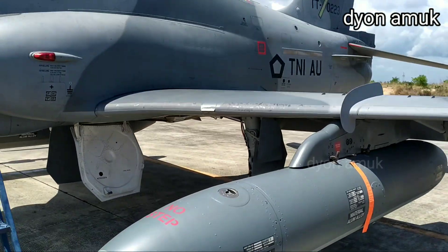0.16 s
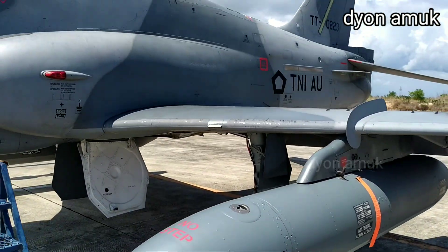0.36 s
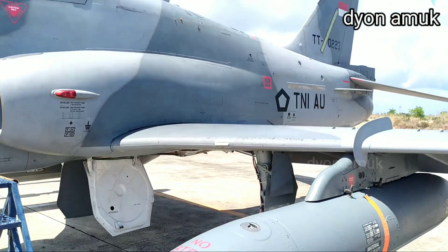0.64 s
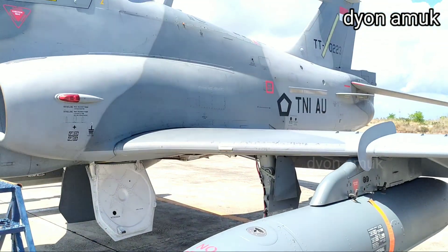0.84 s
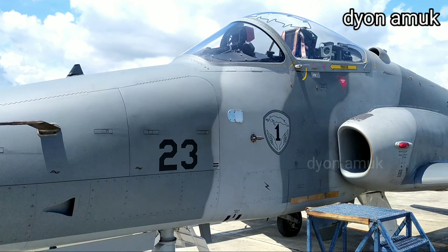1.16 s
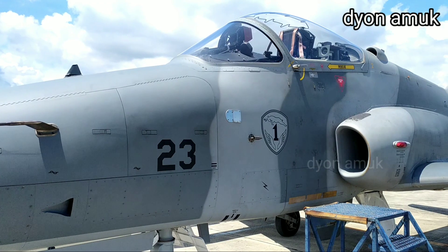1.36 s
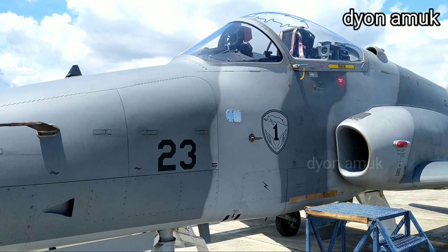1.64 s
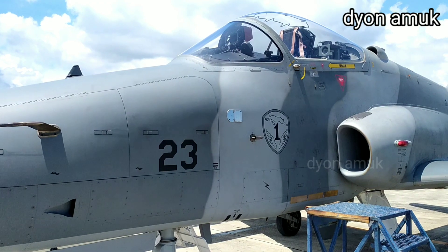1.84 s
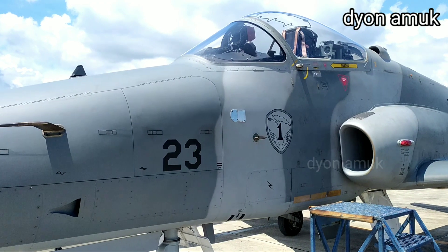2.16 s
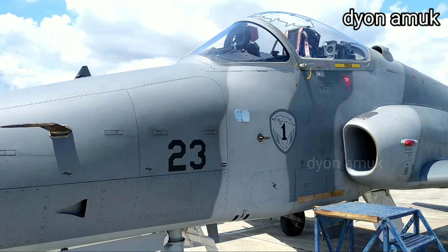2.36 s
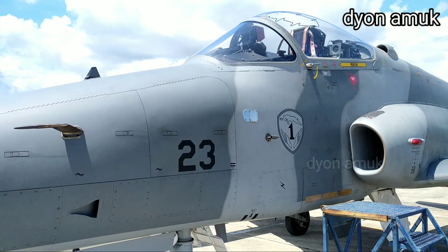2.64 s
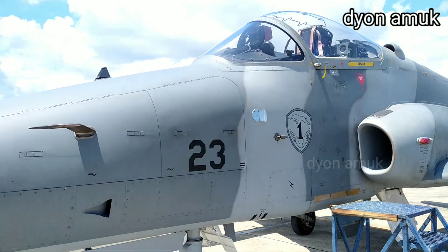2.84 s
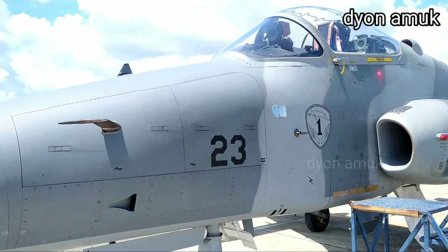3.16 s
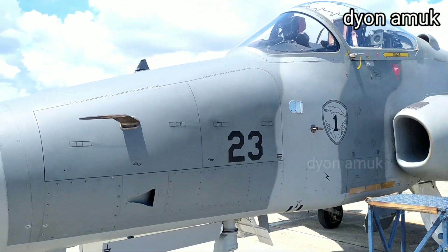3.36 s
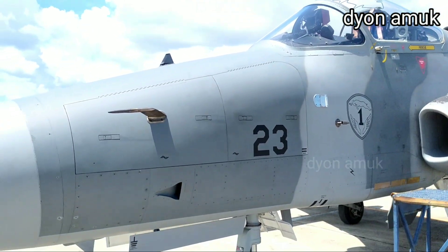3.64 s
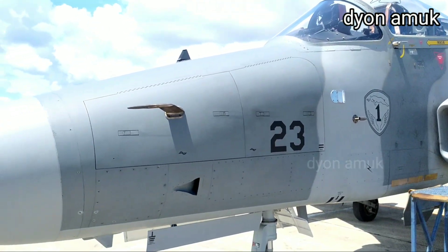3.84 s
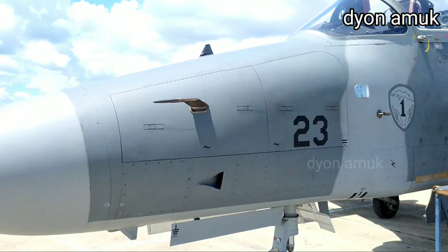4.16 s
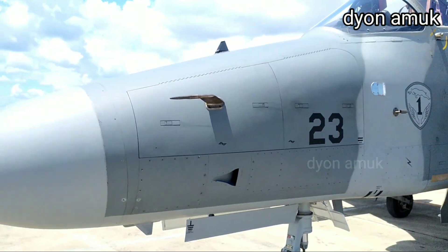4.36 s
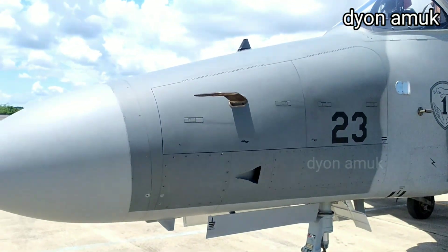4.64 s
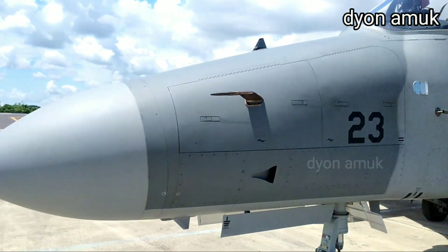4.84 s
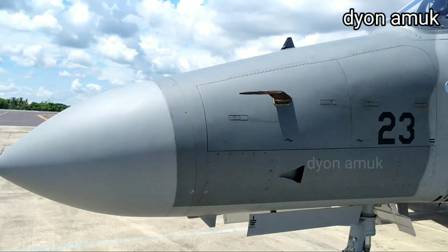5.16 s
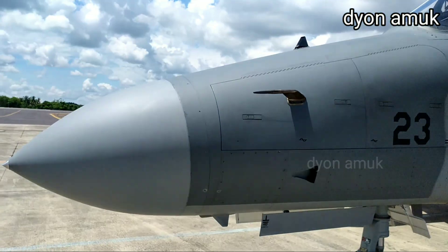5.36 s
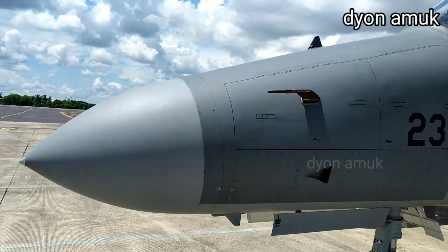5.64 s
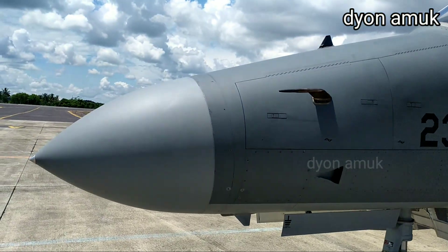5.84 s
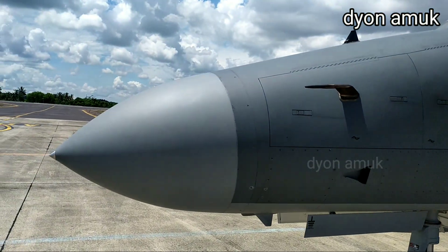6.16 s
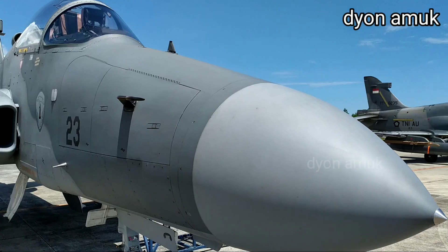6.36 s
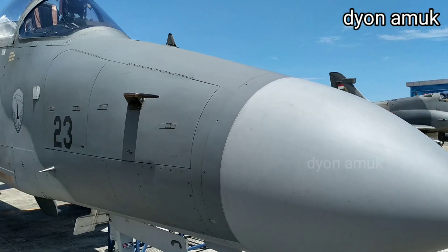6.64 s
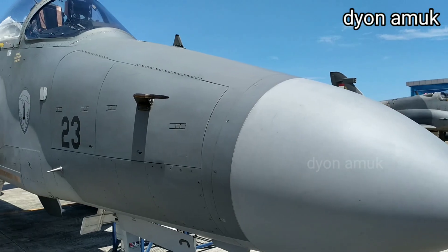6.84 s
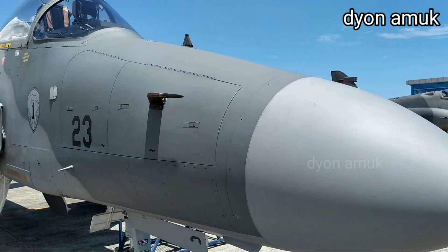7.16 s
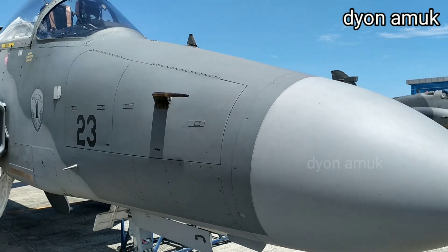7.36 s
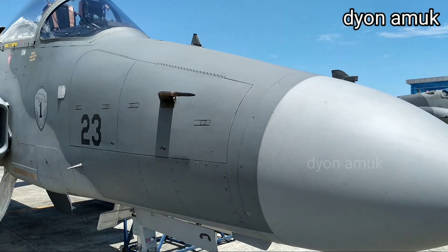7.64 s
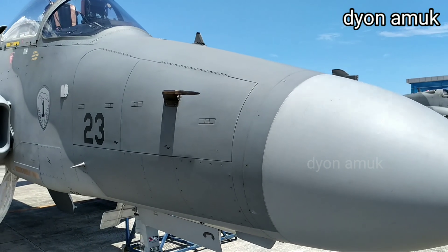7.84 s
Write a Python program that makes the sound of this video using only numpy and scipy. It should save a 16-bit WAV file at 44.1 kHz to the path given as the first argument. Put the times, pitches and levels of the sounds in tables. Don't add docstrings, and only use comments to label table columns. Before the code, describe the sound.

Close turbine roar and wavering high whine on an open apron, with buffeting wind and two abrupt dropouts between three differently coloured views.

```python
import sys
import numpy as np
from scipy import signal
from scipy.fft import rfft, irfft, next_fast_len
from scipy.io import wavfile
from scipy.ndimage import uniform_filter1d, minimum_filter1d, map_coordinates

SR = 44100
rng = np.random.default_rng(int(sys.argv[2]) if len(sys.argv) > 2 else 0)


def convert_level_to_amplitude(level_db):
    exponent = np.asarray(level_db, float) / 20
    return 10 ** exponent


def unload_audio(sound):
    columns = np.transpose(np.atleast_2d(sound))
    steps = np.round(np.clip(columns, -1, 1) * 32767)
    wavfile.write(sys.argv[1], SR, steps.astype(np.int16))


N = 352519
T, SIZE = np.arange(N) / SR, next_fast_len(N, True)
F = np.arange(SIZE // 2 + 1) * SR / SIZE
SLOW = np.arange(N // 512 + 2) * 512 / SR
WINDOW = np.sin(np.pi * (np.arange(1024) + .5) / 1024)

# f/Hz, left level/dB per Hz, right level/dB per Hz
BESIDE = [(262, -66.5, -68), (595, -73.5, -72), (1006, -77.5, -77.5), (1284, -78.5, -88.5),
          (1840, -78, -84.5), (2030, -72.5, -85), (2650, -75, -86.5), (3320, -75.5, -89),
          (3770, -78.5, -89), (3930, -81.5, -87), (5760, -87.5, -87), (6700, -84, -95.5), (7930, -84, -90),
          (9170, -100, -91), (11150, -88.5, -93.5), (11300, -90, -97), (12900, -96, -94),
          (15570, -113.0, -113.0), (15400, -122, -122)]
INTAKE = [(250, -65.5, -53), (728, -74, -73.5), (950, -79, -79), (1396, -84, -83), (1780, -81.5, -79),
          (1990, -74.5, -81.5), (2590, -71, -84), (3300, -72.5, -85), (3730, -74, -87.5),
          (4300, -79, -85.5), (5800, -95, -87.5), (6800, -82.5, -87.5), (8100, -81, -95.5),
          (8900, -93.5, -99), (11000, -86, -97.5), (12100, -91, -96.5), (13200, -88.5, -94),
          (14700, -116, -116), (15400, -120, -120)]
NOSE = [(250, -65.5, -61), (744, -71.5, -71), (950, -73, -74.5), (1396, -77, -79.5), (1776, -78, -81.5),
        (2000, -75.5, -85), (2600, -73, -83.5), (3290, -75, -90), (3700, -76, -84.5), (4300, -77.5, -90.5),
        (5800, -91, -92.5), (6800, -89, -96), (8100, -78.5, -100), (8900, -99, -93.5), (11000, -94, -91.5),
        (12100, -88.5, -96.5), (13200, -93, -95), (14700, -94, -109), (15400, -100, -114)]
ACROSS = [(250, -68, -77), (734, -75.5, -77), (970, -79.5, -80), (1410, -80, -90), (1790, -83, -92.5),
          (2020, -86.5, -91), (2600, -92.5, -90.5), (3300, -84.5, -87.5), (3700, -94, -85.5),
          (4400, -88.5, -87.5), (5800, -98, -93), (6800, -95.5, -97), (8100, -90.5, -92.5),
          (8900, -95.5, -87.5), (11000, -102.5, -102.5), (12100, -99, -100), (13200, -95, -96.5),
          (14700, -110, -110), (15400, -122, -122)]
ROAR_COLOUR = np.array([BESIDE, INTAKE, NOSE, ACROSS])
# t/s, level/dB
SWELL = [(.2, -3.5), (.65, 0), (.95, -3), (1.35, -4), (1.6, -2.5), (2.1, 0.5), (2.4, -1.4), (3.15, 0.5),
         (3.48, 5), (3.7, 2), (3.95, 2.5), (4.3, -0.7), (4.8, 0.3), (5.5, -0.6), (5.85, 1.6), (6.2, 0.1),
         (7., 4), (7.25, 2), (7.8, 3.5)]
# t/s, level/dB
TOP_FLARES = [(.4, -1.5), (1.1, -2), (1.6, 0.5), (2.2, -1.5), (3.0, 1.5), (3.85, -2), (4.45, -2.5),
              (5.3, 0.5), (6.2, -1), (7.33, 4)]
# t/s, level/dB
AIR = [(0, -8), (3.1, -6), (3.5, -2.5), (3.9, 3), (4.3, 1), (5.0, 0.5), (5.9, 0), (6.4, -6), (6.6, 7),
       (7.1, 4), (7.3, 9), (7.6, 4), (8, 5)]


def roar(whine_db):
    swell_db, = curves(SWELL)
    mid_db, high_db, right_db = swell_db, 0.81 * swell_db + 0.83 * whine_db, 0.7 * swell_db
    top_db, air_db = flares(TOP_FLARES, width_s=0.2), curves(AIR)[0]
    shared, apart = rng.standard_normal((2, N))
    f, s, z = signal.stft(np.array([late(shared), shared, apart]), SR, WINDOW, 1024)
    octave = np.log(f + 1)
    like = likeness(octave, len(s))
    z = np.array([z[0], like * z[1] + np.sqrt(1 - like ** 2) * z[2]])
    gain = np.zeros(z.shape)
    band_hz = ROAR_COLOUR[0, :, 0]
    for k, hz in enumerate(band_hz):
        band = np.interp(octave, np.log(band_hz), np.arange(len(band_hz)) == k)
        left_level = by_heading(ROAR_COLOUR[:, k, 1])
        right_level = by_heading(ROAR_COLOUR[:, k, 2 if k else 1])
        if 1500 < hz < 8500:
            left_level = left_level + (mid_db if hz < 5000 else high_db)
            right_level = right_level + right_db
        if 10500 < hz < 14000:
            left_level, right_level = left_level + top_db, right_level + .6 * top_db
        if hz > 14000:
            left_level, right_level = left_level + air_db, right_level + air_db
        level = convert_level_to_amplitude(np.array([left_level, right_level]) + 0.67 * walk(5))
        gain[:, band > 0] += band[band > 0, None] * level[:, None, :len(s)]
    gain *= body_notches(f, len(s))
    out = signal.istft(z * gain * np.sqrt(SR / 2), SR, WINDOW, 1024)[1][:, :N]
    return signal.sosfilt(signal.butter(3, 62., "high", fs=SR, output="sos"), out)


# f/Hz, likeness/0-1
LIKENESS = [(250, 1), (850, 1), (1700, 0.61), (3500, 0.4), (5800, 0.1), (8900, 0), (14500, 0.2)]
# f/Hz, change of likeness/1
FOCUS = [
    (1600, -0.11),
    (1730, -0.35),
    (1390, -0.063),
    (2300, -1.5),
]
# f/Hz, change of likeness/1
NARROW_FOCUS = [(1850, .02), (1800, 0.25), (1768, .3), (3330, 0.9)]
# t/s, change of likeness/1
LATE_FOCUS = [(5.3, 0), (5.8, 0.085), (6.05, 0.29), (6.5, 0.29), (6.51, 0.16)]
# f/Hz, change of likeness/1
OPPOSED = [(5550, -0.25), (5680, -0.56), (5900, -0.36), (14900, -1.1)]


def likeness(octave, frames):
    like_hz, like = np.transpose(LIKENESS)
    like = np.clip(np.interp(octave, np.log(like_hz), like), 0, 1)[:, None]

    def bell(hz, width):
        return np.exp(-((octave[:, None] - np.log(hz)) / width) ** 2)

    for table, width in ((FOCUS, .28), (NARROW_FOCUS, .1)):
        hz, change = (by_heading(c)[:frames] for c in np.transpose(table))
        like = np.clip(like + change * bell(hz, width), 0, 1)
    like = np.clip(like + curves(LATE_FOCUS)[0][:frames] * bell(1430., 0.71), 0, 1)
    hz, change = (by_heading(c)[:frames] for c in np.transpose(OPPOSED))
    return np.clip(like + change * bell(hz, 0.039), -1, 1)


# t/s, f/Hz
BODY_NOTCH = [(0, 5550), (1.1, 5680), (3.4, 5680), (4.5, 5720), (5.1, 5800), (5.4, 6100), (6.4, 6300),
              (6.6, 6650), (8, 6650)]
# f/Hz, left depth/0-1, right depth/0-1
PORT_NOTCH = [
    (5200, 0, 0.1),
    (3340, 0.07, 0.8),
    (4450, 0, .35),
    (5000, 0.9, 0.37),
]


def body_notches(f, frames):
    gain = 1
    for notch_hz, width_hz, depth in (
            (curves(BODY_NOTCH)[0], 230., by_heading([0.43, 0.48, 0.71, 0.055])[:frames]),
            (by_heading([14100, 13600, 13750, 14500]), 250., .5),
            (by_heading([9300, 8520, 8840, 10400]), 260., .45),
            (by_heading([11200, 11420, 11950, 11600]), 600., by_heading([0.32, 0.41, 0.23, 0.068])[:frames])):
        gain = gain * (1 - depth * np.exp(-((f[:, None] - notch_hz[:frames]) / width_hz) ** 2))
    notch_hz, *depth = (by_heading(c)[:frames] for c in np.transpose(PORT_NOTCH))
    return gain * (1 - np.array(depth)[:, None] * np.exp(-((f[:, None] - notch_hz) / 190.0) ** 2))


GEAR_HZ = 640.7
TONE_HZ = [
    200.5,
    813.5,
    GEAR_HZ,
    2 * GEAR_HZ,
    3 * GEAR_HZ,
    4 * GEAR_HZ,
    5 * GEAR_HZ,
    2650,
    9460,
    9748,
]
# level/dB rms beside, at intake, at nose, across
TONES = [(-43.5, -44, -44, -45.5), (-49, -48, -47, -53.5), (-53, -63.5, -48.5, -70),
         (-61.5, -61.5, -52.5, -59.5), (-55, -53.5, -57, -56.5), (-62, -55, -57, -76),
         (-61.5, -56, -60, -76.1), (-56, -51.5, -54, -67), (-80, -73.5, -75.5, -80),
         (-57.5, -55.5, -53.5, -65)]
TONE_WIDTH_HZ = [6., 3., 3., 3., 10., 6., 8., 25., 50., 12.]
# t/s, level/dB
GEAR_FLARES = [(.35, -7), (.85, 4.5), (1.35, 10.5), (2.95, 9.5), (3.3, -9), (3.8, -11), (4.25, 4.5),
               (4.62, 2), (5.15, -6.5), (5.85, -21.5)]
# t/s, level/dB
BLADE_BEAM = [(.1, -10.5), (.5, -2), (.9, -2), (1.5, -3), (1.9, 1.5), (2.5, 4.5), (2.9, 2), (4.1, -1.5),
              (4.7, -3.5), (5.1, -1), (5.8, -4.5), (6.3, 3), (6.7, -2), (7.5, -6), (8, -1)]
# t/s, left lead/rad
BLADE_LEAD = [(0, 2.9), (.6, 2), (1.15, 3.2), (2.65, 3), (3.1, 1.4), (3.6, -.8), (4.1, -1.2), (4.6, -2.3),
              (5.1, -1.9), (5.45, -4.3), (6.5, -4.2), (6.6, -3.3), (8, -3.3)]


def tones(whine_db):
    whine_db = whine_db + curves(BLADE_BEAM)[0]
    gear_db = flares(GEAR_FLARES, width_s=0.29)
    hump_shape = sum(1 / (1 + ((F - hz) / width_hz) ** 2) for hz, width_hz in ((9450., 80.), (9760., 130.)))
    hump = irfft(rfft(rng.standard_normal((2, SIZE))) * hump_shape, SIZE)[:, :N]
    hump_db = by_heading([-54.5, -58, -57.0, -61.0]) + whine_db
    hump_left, hump_right = hump / hump.std() * fine(convert_level_to_amplitude(hump_db))
    lead = fine(curves(BLADE_LEAD)[0] + .5 * walk(5))
    right = convert_level_to_amplitude(-4.5) * (0.81 * hump_left + 1.44 * hump_right)
    blades = np.real(signal.hilbert(hump_left, SIZE)[:N] * np.exp(1j * lead))
    left = 0
    for k, (hz, db, width_hz) in enumerate(zip(TONE_HZ, TONES, TONE_WIDTH_HZ)):
        is_blade = hz > 9000
        phase = 2 * np.pi * np.cumsum(fine(hz + .5 * width_hz * walk(12))) / SR
        flare_db = whine_db - 0.5 if is_blade else gear_db if k == 2 else 0
        waver_db = 2.6 if k in (3, 4) or is_blade else 1.4
        level_db = by_heading(db) + flare_db + waver_db * walk(8) - .7
        shade_db = by_heading([np.interp(hz, a[:, 0], a[:, 2] - a[:, 1]) * (600 < hz < 9000)
                               for a in ROAR_COLOUR])
        right = right + np.sqrt(2) * np.sin(phase) * fine(convert_level_to_amplitude(level_db + shade_db - 0.82 * is_blade))
        if is_blade:
            blades = blades + np.sqrt(2) * np.sin(phase + lead) * fine(convert_level_to_amplitude(level_db))
        else:
            left = left + np.sqrt(2) * np.sin(phase) * fine(convert_level_to_amplitude(level_db))
    return np.array([late(left) + blades, right])


# t/s, left after right/ms
PORT_LAG = [(0.05, 0.255), (0.85, 0.245), (1.95, 0.225), (2.75, 0.24), (3.95, 0.285), (5.15, 0.31),
            (5.75, .325), (6.3, 0.35)]
# f/Hz, left lead/rad
ACROSS_LEAD = [(0, 0), (860, 1.7), (1250, 2.7), (1750, 2.8), (2600, 4.4), (3330, 3.15), (3500, 2.6),
               (3950, .6), (4700, .3)]


def late(x, knee_hz=1890.0, detour_ms=0.16):
    spectrum = rfft(x, SIZE)
    detour = np.exp(-2j * np.pi * np.maximum(F - knee_hz, 0) * detour_ms / 1000)
    near = irfft(spectrum * detour, SIZE)[:N]
    lag = np.interp(T, *np.transpose(PORT_LAG)) * SR / 1000
    near = map_coordinates(near, [np.arange(N) - lag], order=3, mode="nearest")
    across = irfft(spectrum * np.exp(1j * np.interp(F, *np.transpose(ACROSS_LEAD))), SIZE)[:N]
    return np.where(T < 6.5, near, across)


# start t/s, end t/s, level/dB
GUSTS_LEFT = [(.08, .2, -50), (.48, .7, -42), (.88, .93, -49), (1.2, 1.28, -32.5), (1.37, 1.45, -31),
              (1.5, 1.97, -34), (1.63, 1.87, -26), (3.39, 3.67, -38.5), (3.69, 3.74, -33),
              (3.86, 3.97, -33.5), (4.28, 4.67, -28.5), (4.08, 4.24, -31), (4.75, 4.97, -40),
              (5.55, 5.77, -54.5), (6.22, 6.4, -57), (7., 8., -47)]
GUSTS_RIGHT = [(-.1, .03, -30), (.31, .41, -30), (.45, .49, -31), (1.05, 1.2, -38), (.88, .93, -38.5),
               (1.43, 2.37, -30), (1.72, 1.79, -28), (2.47, 2.95, -31.5), (3.23, 3.57, -28),
               (3.66, 3.74, -32), (3.78, 3.9, -32.5), (3.94, 4.26, -25.5), (4.43, 4.48, -25),
               (4.6, 4.72, -30), (4.8, 4.97, -39.5), (5.73, 5.87, -48.5), (6.22, 6.4, -45.5),
               (7.05, 7.33, -32), (7.36, 7.62, -32.5), (7.7, 8., -39)]
# t/s, peak level/dB, sharpness/dB
THUMPS_LEFT = [(1.208, -23, -18), (1.386, -21, -18), (1.628, -15, 6), (1.871, -21, -22), (1.932, -20, -19),
               (1.965, -18, -11), (3.691, -19, -12.5), (3.727, -17, -17.5), (3.863, -12, -7),
               (4.113, -13, 5), (4.297, -16, -9), (4.34, -11.5, -7), (4.605, -19.5, -9), (4.643, -23, -23),
               (4.674, -22, -11), (3.886, -15, -10.5), (4.091, -30.5, 2), (4.137, -23, -13),
               (4.194, -32, -5), (4.213, -14, -22)]
THUMPS_RIGHT = [(0.017, -13, -21), (0.358, -18, -10), (0.467, -13.5, -15), (1.774, -15.5, -11.5),
                (1.841, -26, -15), (1.957, -13.5, -7), (2.083, -11, 1), (2.343, -6.5, -7.5),
                (2.369, -14, -11.5), (2.534, -11.5, -13), (2.834, -11, -7), (2.914, -8, -27),
                (3.222, -8, -7.5), (3.33, -10, -11), (3.5, -13.5, -10.5), (3.635, -5.5, -3),
                (3.704, -11.5, -13), (3.749, -11.5, -16.5), (3.953, -9.5, -9.5), (3.994, -12, -10.5),
                (4.051, -9.5, -16), (4.104, -10.5, -10.5), (4.095, -14.5, -12), (4.177, -9, -10),
                (4.463, -17.5, -11.5), (4.683, -18.5, -12), (4.697, -18, -15), (7.008, -19, -13),
                (7.219, -17, -12),
                (2.058, -11, -3.5), (2.067, -7.5, -10.5), (2.355, -9, -5.5), (3.725, -13.5, -1.5),
                (3.949, -12.5, -16), (1.419, -16, -5), (3.462, -16, -12.5), (4.402, -28, -22),
                (3.234, -11, -5.5), (3.582, -14, -12), (3.874, -14.5, -3), (3.958, -11, 7),
                (3.982, -15.5, 1), (4.236, -20, -0.5), (1.317, -19.5, -11), (1.647, -17, -13),
                (2.48, -24, -7), (2.627, -18.5, -6.5), (4.329, -25, -7), (4.648, -23, -16),
                (2.702, -29, -4), (2.76, -26, -5), (3.665, -18, -7), (3.68, -20, -9), (4.82, -15, -12),
                (0.096, -20, -1), (6.92, -25, -20), (7.275, -22, -19.5), (7.401, -20, -4.5),
                (7.566, -19, -1), (7.58, -22, -3), (7.984, -17.5, -15)]
# t/s, peak level/dB, sharpness/dB
SUCTIONS_LEFT = [(1.267, -21.5, -9.5)]
SUCTIONS_RIGHT = [(2.116, -12, -16), (4.466, -20, -10), (4.639, -20, -11), (4.842, -14, -12),
                  (4.918, -19, -14.5), (4.988, -25, -1), (7.093, -22.5, -15), (7.951, -17.5, -12)]


def wind_at_ports():
    left = wind(gusts(GUSTS_LEFT), THUMPS_LEFT, SUCTIONS_LEFT)
    right = wind(gusts(GUSTS_RIGHT), THUMPS_RIGHT, SUCTIONS_RIGHT)
    return np.array([left, right])


# f/Hz, level/dB, rate/per s
EDDIES = [(51.7, -4, 36), (68.5, 0, 60), (114.5, -2.5, 70), (180, -6, 54), (260, -9, 40), (430, -25.5, 34)]


def wind(level_db, thumps, suctions):
    bed = np.zeros(N)
    for hz, db, rate in EDDIES:
        chance = rng.random((3, 1000))
        at = np.cumsum(-np.log(chance[0]) * SR / rate).astype(int)
        push = convert_level_to_amplitude(-2.3 * np.log(0.21 + chance[1])) * np.sign(chance[2] - .35)
        hits = np.zeros(N)
        hits[at[at < N]] = push[at < N]
        bed += convert_level_to_amplitude(db) * signal.oaconvolve(hits, eddy(hz, cycles=0.62), "same")
    out = bed / bed.std() * fine(convert_level_to_amplitude(level_db + 2.0 * walk(25)))
    signs = np.repeat([1, -1], [len(thumps), len(suctions)])
    for (s, db, sharp_db), sign, chance in zip(thumps + suctions, signs, rng.random((len(signs), 2))):
        hz = 120 * 2 ** ((sharp_db + 10.5) / 11)
        core = (0, 1, -1.5)
        front = (-.006 * chance[0], 290 / hz, min(sharp_db, -6) - 3.0)
        wake = (0.00806 + 0.0078 * chance[1], .75, -10.)
        for after, scale, part_db in (core, front, wake):
            bump = sign * convert_level_to_amplitude(db + part_db) * eddy(scale * hz, cycles=0.53)
            i = int((s + after) * SR) - len(bump) // 2
            out[max(i, 0):i + len(bump)] += bump[max(-i, 0):N - i]
    return out


def eddy(hz, cycles):
    t = np.arange(-3, 3, hz / SR)
    return np.cos(2 * np.pi * t) * np.exp(-(t / cycles) ** 2)


def gusts(table, rise_db_s=135, fall_db_s=109, calm_db=-57):
    power = convert_level_to_amplitude(2 * calm_db)
    for start, end, db in table:
        slope_db = rise_db_s * np.maximum(start - SLOW, 0) + fall_db_s * np.maximum(SLOW - end, 0)
        power = power + convert_level_to_amplitude(2 * (db - slope_db))
    return 10 * np.log10(power)


# t/s, peak level/dB, length/ms
TAPS = [
    (0.8893, -20.5, 0.36),
    (0.898, -16, 2),
]


def taps():
    out = np.zeros(N)
    for s, db, ms in TAPS:
        t = (T - s) * 1000 / ms
        out -= convert_level_to_amplitude(db) * np.tanh(8 * t + 2) * np.exp(-np.abs(t))
    return out


# t/s, heading/0-3 (beside, intake, nose, across)
HEADING = [
    (0, 0),
    (1, 0),
    (1.01, 1),
    (2.4, 1),
    (5.3, 2),
    (6.5, 2),
    (6.51, 3),
    (8, 3),
]


def by_heading(values):
    s, heading = np.transpose(HEADING)
    return np.interp(SLOW, s, np.asarray(values)[heading.astype(int)])


def curves(table):
    s, *columns = np.transpose(table)
    return [np.interp(SLOW, s, c) for c in columns]


def flares(table, width_s):
    return sum(db * np.exp(-((SLOW - s) / width_s) ** 2) for s, db in table)


def walk(rate):
    knots = rng.standard_normal(int(8.1 * rate) + 2)
    return 1.2 * np.interp(SLOW * rate, np.arange(len(knots)), knots)


def fine(slow):
    return np.interp(T, SLOW, slow)


# t/s, level/dB
WHINE_FLARES = [(.15, 2), (.8, 0), (1.22, 5), (1.57, 9.5), (1.97, 0.5), (2.5, 1.5), (2.88, 4), (3.95, 1),
                (5.15, 0.5), (5.85, -0.5), (6.2, 1)]


def scene():
    whine_db = flares(WHINE_FLARES, width_s=.17)
    handling = np.array([taps(), np.zeros(N)])
    return roar(whine_db) + tones(whine_db) + wind_at_ports() + handling


# f/Hz, level/dB per Hz
KEPT = [(1000, -100), (5000, -99.5), (8500, -99), (9800, -100), (11000, -99), (12300, -102), (13500, -103),
        (14500, -105)]
# start t/s, end t/s, from f/Hz, to f/Hz
THINNED = [(.4, .9, 10250, 11300), (1.12, 1.5, 10700, 11900), (1.7, 1.95, 11000, 11900),
           (1.95, 2.38, 10250, 11800), (2.42, 2.55, 10250, 11700), (2.65, 3.4, 10250, 12200),
           (3.45, 3.62, 10250, 11300), (3.72, 3.82, 10250, 11300), (3.92, 4.32, 10250, 11700),
           (3.4, 5.1, 10150, 10550), (6.1, 6.4, 10150, 10500), (0, 1, 13400, 15500),
           (1, 3.25, 13800, 15500), (3.35, 3.5, 14000, 15500), (3.62, 3.8, 14300, 15500),
           (3.5, 4.65, 13300, 14000), (5.9, 6.4, 13000, 13800)]


def thin_hiss(x, count=8, masked_db=-14.5, bin_db=3.5, wobble_size_db=4.0, sparse_db=2.5):
    window = np.sin(np.pi * (np.arange(2048) + .5) / 2048)
    mid_side = np.array([x[0] + x[1], x[0] - x[1]]) / 2
    hz, s, z = signal.stft(mid_side, SR, window, 2048, scaling="psd")
    hz = hz[:1024, None]
    band_hz = hz[::count]
    power_db = 10 * np.log10(2 * np.abs(z[:, :1024]) ** 2 + 1e-20)
    band_db = 10 * np.log10(convert_level_to_amplitude(2 * power_db).reshape(2, -1, count, len(s)).mean(axis=2))
    loudest_db = band_db.max(axis=0)
    around_db = uniform_filter1d(np.minimum(loudest_db, -72.), size=17, axis=0)
    around_db = uniform_filter1d(around_db, size=3, axis=1)
    spread_db = -minimum_filter1d(-loudest_db, size=7, axis=0) - 18.0 - 99 * (band_hz < 8900)
    around_db = np.maximum(around_db, spread_db - masked_db)
    wobble = uniform_filter1d(rng.standard_normal(around_db.shape), size=2, axis=0)
    wobble_db = wobble_size_db * 2.3 * uniform_filter1d(wobble, size=2, axis=1)
    faint_db = np.interp(hz, *np.transpose(KEPT)) + np.repeat(wobble_db, count, axis=0)
    blocks_db = 4.9 * np.repeat(rng.standard_normal((32, len(s))), 32, axis=0)
    for start, end, from_hz, top_hz in THINNED:
        inside = (hz > from_hz) & (hz < top_hz) & (s > start) & (s < end)
        faint_db = faint_db + ((11. if from_hz < 12000 else 10.) + blocks_db) * inside
    unmasked = band_db > around_db + masked_db + wobble_db - 2.5 * (band_hz < 1700)
    heard = np.repeat(unmasked, count, axis=1) | (hz < 1150)
    band_clear = np.repeat(band_db, count, axis=1) > faint_db
    bin_clear = power_db > faint_db + bin_db + sparse_db * (hz > 8300)
    z[:, :1024] *= heard & band_clear & bin_clear
    mid, side = signal.istft(z, SR, window, 2048, scaling="psd")[1][:, :N]
    return np.array([mid + side, mid - side])


def band_limit(x):
    return signal.sosfilt(signal.butter(12, 15520, fs=SR, output="sos"), x)


# start t/s, end t/s, fade-in/s, fade curve power/1
SHOTS = [
    (-1, .958, .1, 1.01),
    (1.046, 6.344, .18, 1.1),
    (6.685, 9, .14, .75),
]


def record(dry):
    gate = np.zeros(N)
    for start, end, fade, power in SHOTS:
        rise = np.clip((T - start) / fade, 0, 1) ** power
        tail = convert_level_to_amplitude(-11.0 - 3600 * (T - end)) * (T < end + .018)
        gate += rise * np.where(T < end, 1, tail)
    high_pass = signal.butter(3, 40., "high", fs=SR, output="sos")
    mix = thin_hiss(signal.sosfiltfilt(high_pass, dry)) * gate
    return band_limit(mix)


dry = scene()
out = record(dry)
unload_audio(out)
```